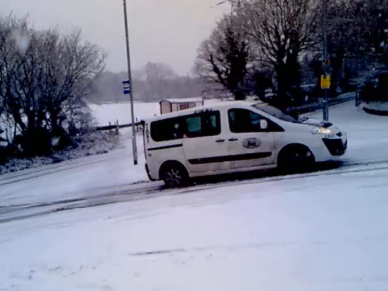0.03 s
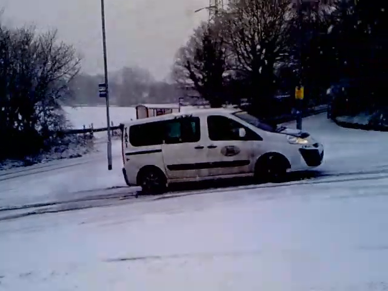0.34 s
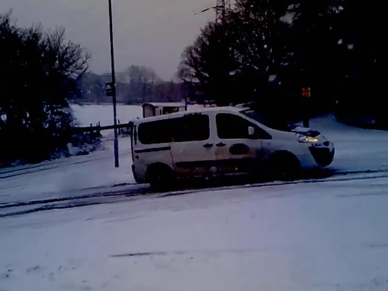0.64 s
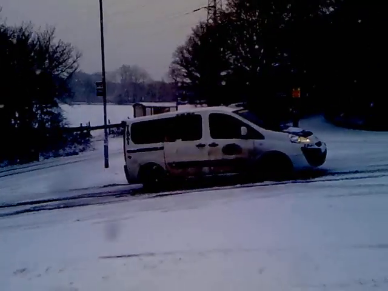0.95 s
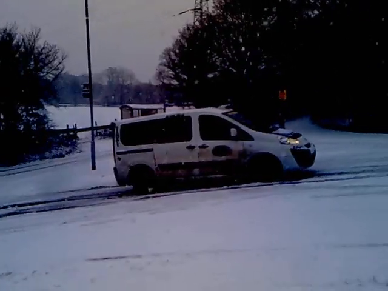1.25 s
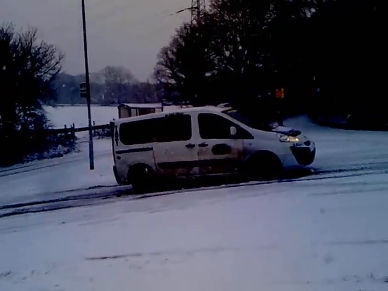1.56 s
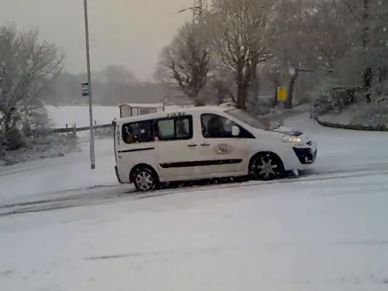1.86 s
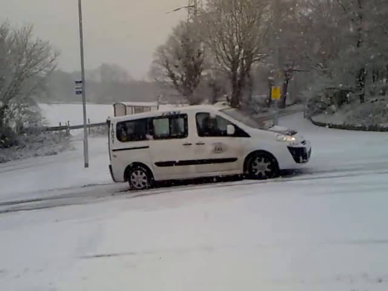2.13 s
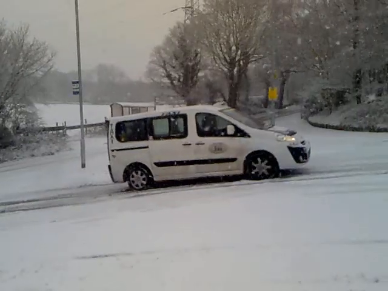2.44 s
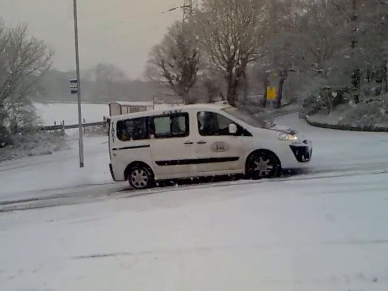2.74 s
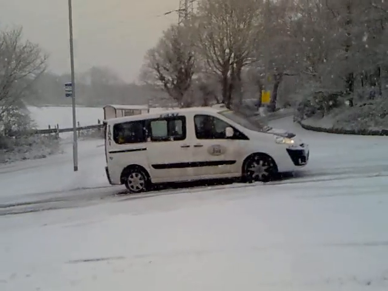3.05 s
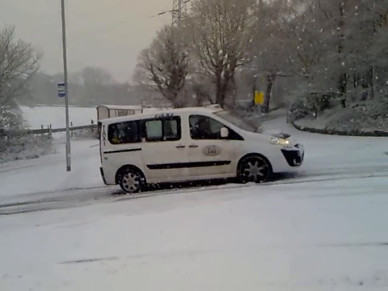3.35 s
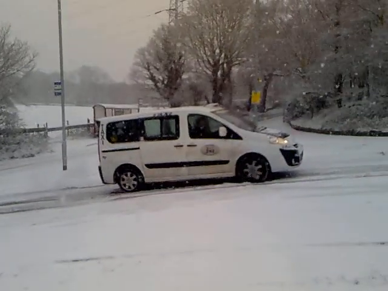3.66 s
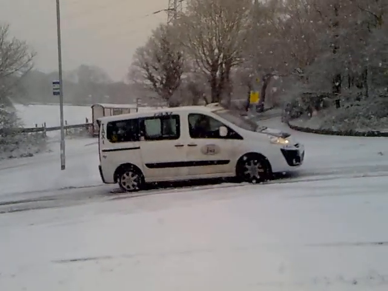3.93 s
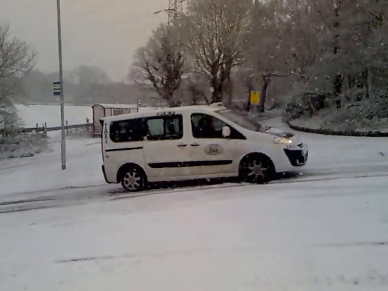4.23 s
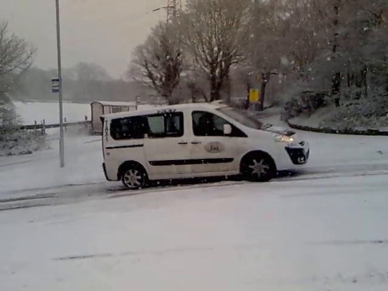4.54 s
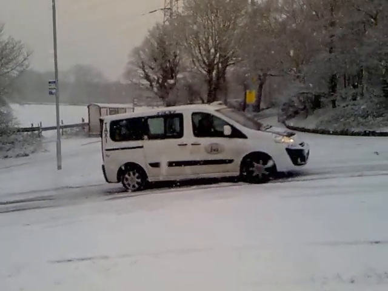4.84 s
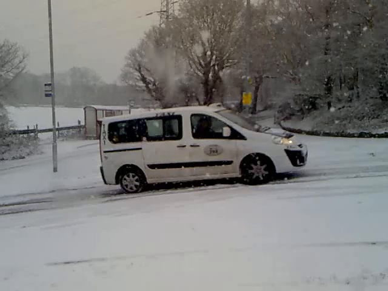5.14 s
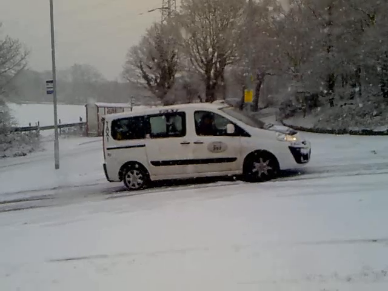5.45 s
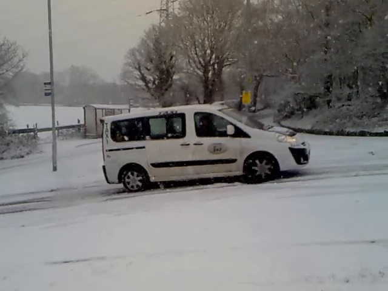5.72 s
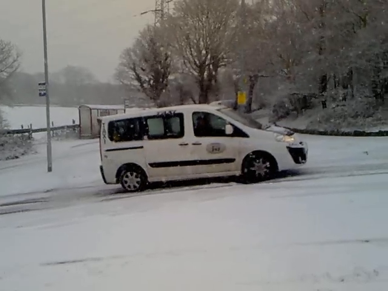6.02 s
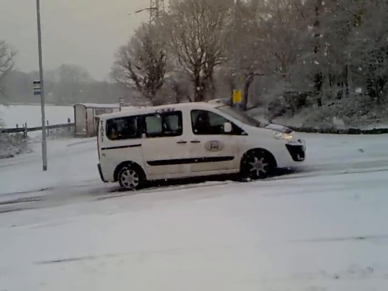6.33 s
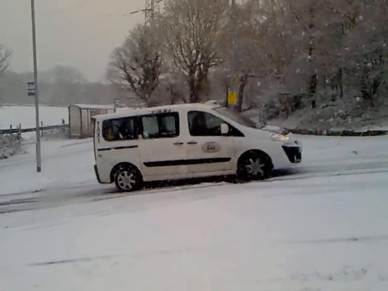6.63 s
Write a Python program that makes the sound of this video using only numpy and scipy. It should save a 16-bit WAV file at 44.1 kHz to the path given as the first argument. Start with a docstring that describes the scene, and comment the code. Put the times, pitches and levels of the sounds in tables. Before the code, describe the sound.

Outdoors, with no echo and a faint microphone hiss, a creeping van revs twice over the constant rumble and clatter of a large idling diesel. Air brakes vent in one bright burst, a deep drone fades away, and everything cuts out briefly. The engines return, the van chugging hollowly before it revs a third time. One light tap sounds close by early on, and another just before the end.

```python
"""Snowy junction, beside an idling heavy diesel: exhaust throb, combustion clatter, steady hum. A second deep
drone beats with the idle, then fades. A creeping van revs three times, its firings ringing the silencer. The
heavy vehicle vents brake air once, through a ringing pipe and a bright jet. Two small knocks fall close by. The
sound starts after a short silence and cuts out briefly halfway."""
import sys
import numpy as np
from scipy import signal
from scipy.fft import rfft, irfft, next_fast_len
from scipy.io import wavfile

SR = 44100
rng = np.random.default_rng(int(sys.argv[2]) if len(sys.argv) > 2 else 0)


def bounce(signal):
    """Save signal as a 16-bit WAV file at the path given by the first command-line argument."""
    frames = np.transpose(np.atleast_2d(signal))
    limited = np.clip(frames, -1, 1)
    pcm = np.round(limited * 32767).astype(np.int16)
    wavfile.write(sys.argv[1], SR, pcm)


N = 298998
T = np.arange(N) / SR

# diesel exhaust (order [x firing rate], level [dB])
IDLE_ORDERS = [(1, -41), (1.5, -57.5), (2, -56), (3, -59.5), (4, -64.5)]
# diesel noise spectra (frequency [Hz], relative density [dB])
CLATTER_SPECTRUM = [(200, -17.5), (290, -3), (360, -1.5), (500, -3), (660, -3.5), (800, -1.1), (1000, 0.5),
                    (1250, -4), (1700, -5), (2200, -7), (2600, -13), (3300, -19), (4400, -27),
                    (5700, -23.5), (7000, -28.5), (9000, -47.5)]
RUMBLE_SPECTRUM = [(12, -27), (26, -16), (45, -3.5), (65, 1), (90, -3), (130, -5), (190, -5.5), (260, -8),
                   (330, -12.5), (480, -31.5), (900, -50)]
# engine panels (frequency [Hz], relative level [dB])
PANEL_MODES = [(312, 3.5), (575, -1.5), (788, 0.5), (990, -5), (1380, -0.5)]
# van pedal (down [s], up [s], top firing rate [Hz], load [dB])
PEDAL_PRESSES = [(-0.5, 0.54, 36.71, 3.5), (1.56, 2.40, 40.54, 1.5), (6.0, 7, 39.9, -0.2)]
# van exhaust (order [x firing rate], relative level [dB])
VAN_ORDERS = [(1, -57), (2, -51.5), (3, -48.5), (4, -50.5), (5, -62.5), (6, -61)]
# van rattle (frequency [Hz], relative density [dB])
RATTLE_SPECTRUM = [(150, -13), (330, 1.5), (600, 0), (900, -2.5), (1400, -1), (2100, -11), (2900, -9),
                   (3600, -12.5), (4400, -25), (7000, -42)]
# silencer drive per cylinder (relative level [dB])
CYLINDERS_DB = [0, -1, -8, -9]
# brake air spectra (frequency [Hz], relative density [dB])
PIPE_SPECTRUM = [(600, -29.5), (1100, -3.5), (1650, -4.5), (2200, -6), (2800, -11.5), (3400, -11),
                 (4000, -24.5), (5000, -35)]
JET_SPECTRUM = [(3000, -31), (4300, -8.5), (5400, -8), (6250, -2.5), (6750, -2.5), (7300, -7.5),
                (8000, -12.5), (9000, -17.5), (10500, -21.5), (12500, -39)]
# brake air resonances (frequency [Hz], relative level [dB])
PIPE_MODES = [(1075, -6), (1195, -0.5), (1515, -1), (1565, -9), (1617, -0.5), (1710, -1.5), (1765, -2),
              (1902, 0.5), (2188, -1.5), (2270, -1.5), (2460, -4), (2653, -4), (2775, -2.5), (2972, -6.5),
              (3160, -13), (3290, -30), (3492, -11.5)]
JET_MODES = [(5512, -73.5), (5927, -69), (6045, -67), (6239, -68), (6295, -64.5), (6514, -69), (6982, -78),
             (7181, -71)]
# panel taps (time [s], level [dB], frequency [Hz], decay [s])
KNOCKS = [(1.1686, -31, 480, .002), (6.7553, -21, 760, .0012)]
# steady hum tones (frequency [Hz], level [dB])
HUM_TONES = [(112.2, -59.5), (224.5, -59.5)]
# microphone hiss (frequency [Hz], relative density [dB])
HISS_SPECTRUM = [(1000, 2.5), (5000, -11.5), (8500, -3), (11000, -3), (13500, -1), (15600, 0)]
# spans with sound (start [s], stop [s])
AUDIBLE_SPANS = [(0.229, 3.56), (3.719, 6.9)]

IDLE_FIRING_HZ, CLATTER_DB, RUMBLE_DB = 35.03, -47.5, -49.0
DRONE_HZ, DRONE_DB, DRONE_HOLD_UNTIL_S, DRONE_FADE_DB_PER_S = 43.55, -48.5, 3.2, 45
TICKOVER_HZ, CLIMB_HZ_PER_S, COAST_HZ_PER_S = 26.2, 18.5, 26
EXHAUST_DB_PER_OCTAVE, RATTLE_DB_PER_OCTAVE = 27.5, 18.5
SILENCER_HZ, SILENCER_WIDTH_HZ, CYLINDER_1_FIRES_S = 220.4, 22.5, 3.998
VALVE_OPEN_S, VALVE_SHUT_S = 2.832, 3.174
PIPE_DB, PIPE_ATTACK_S, PIPE_FADE_DB_PER_S = -41, 0.0083, 605
LEAK_DB, LEAK_FADE_DB_PER_S = -51.5, 66
JET_DB, JET_ATTACK_S, JET_HOLD_S, JET_FADE_DB_PER_S = -48.5, 0.036, 0.27, 190
LOW_PASS_HZ = 15750


def diesel_idle():
    """Six cylinders at governed speed: exhaust throb, clatter with ringing panels, rumble."""
    cycles = IDLE_FIRING_HZ * T + 0.014 * wander(2.5)
    throb = sum(gain_of(db) * tone(order * cycles) for order, db in IDLE_ORDERS)
    pulses = firings(cycles, depth=0.4, decay_cycles=0.15, uneven_db=2.5, cylinders=6)
    colour = unit_rms(noise(CLATTER_SPECTRUM) + 0.27 * ringing(PANEL_MODES, width_hz=28))
    clatter = colour * pulses * gain_of(CLATTER_DB + 0.26 * wander(12))
    rumble = noise(RUMBLE_SPECTRUM) * gain_of(RUMBLE_DB + 1.2 * wander(8))
    return throb + clatter + rumble


def drone():
    """Deep tone that beats with the idle, then fades."""
    level_db = DRONE_DB - DRONE_FADE_DB_PER_S * np.maximum(T - DRONE_HOLD_UNTIL_S, 0)
    return tone(DRONE_HZ * T + 0.055 * wander(1.6)) * gain_of(level_db)


def van():
    """Four cylinders: exhaust and rattle grow with revs and load; chug is clearest at tickover."""
    firing_hz, load_db = pedal()
    revs_octaves = np.log2(firing_hz / firing_hz.max())
    cycles = np.cumsum(firing_hz) / SR
    cycles = cycles - np.interp(CYLINDER_1_FIRES_S, T, cycles) + 0.025 * wander(6)
    exhaust = sum(gain_of(db + 1.04 * wander(7)) * tone(order * cycles) for order, db in VAN_ORDERS)
    exhaust *= gain_of(-1.1 + EXHAUST_DB_PER_OCTAVE * revs_octaves + 0.69 * load_db)
    rattle = noise(RATTLE_SPECTRUM)
    rattle *= firings(cycles, depth=1.1, decay_cycles=0.2, uneven_db=1.0, cylinders=4)
    rattle *= gain_of(-49.0 + RATTLE_DB_PER_OCTAVE * revs_octaves + load_db)
    chug = silencer(cycles) * gain_of(-52.5 - 5.1 * revs_octaves)
    return exhaust + rattle + chug


def pedal():
    """Each press raises the revs, which coast back to tickover. Returns (firing rate [Hz], load [dB])."""
    lift_hz, load_db = np.zeros(N), np.zeros(N)
    for down_s, up_s, top_hz, top_load_db in PEDAL_PRESSES:
        span_hz = top_hz - TICKOVER_HZ
        climb_hz = CLIMB_HZ_PER_S * (T - down_s)
        coast_hz = span_hz - COAST_HZ_PER_S * (T - up_s)
        press_hz = np.clip(np.minimum(climb_hz, coast_hz), 0, span_hz)
        lift_hz += press_hz
        load_db += top_load_db * press_hz / span_hz
    return TICKOVER_HZ + lift_hz, load_db


def silencer(cycles):
    """Each firing rings the hollow box; two strong cylinders, then two weak, make it chug."""
    stroke = np.floor(cycles).astype(int)
    strength = gain_of(CYLINDERS_DB)[stroke % len(CYLINDERS_DB)]
    puffs = strength * np.exp(-(cycles % 1) / 0.33) * rng.standard_normal(N)
    kicks = strength * np.diff(stroke, prepend=stroke[0])
    drive = unit_rms(puffs) + 1.7 * unit_rms(kicks)
    box = signal.iirpeak(SILENCER_HZ, Q=SILENCER_HZ / SILENCER_WIDTH_HZ, fs=SR)
    tailpipe = signal.iirpeak(SILENCER_HZ, Q=1.3, fs=SR)
    return unit_rms(signal.lfilter(*tailpipe, signal.lfilter(*box, drive)))


def firings(cycles, depth, decay_cycles, uneven_db, cylinders):
    """Envelope of one dying puff per firing; strength varies by cylinder and by stroke."""
    elapsed = cycles - cycles.min()
    stroke = elapsed.astype(int)
    bias, jitter = rng.standard_normal(cylinders), rng.standard_normal(1024)
    strength = gain_of(uneven_db * (bias[stroke % cylinders] + jitter[stroke % len(jitter)]))
    return unit_rms(1 + depth * strength * np.exp(-(elapsed % 1) / decay_cycles))


def brake_air():
    """Air rings a pipe; the jet builds later and dies first as pressure drops. A weak leak lingers."""
    pipe = unit_rms(noise(PIPE_SPECTRUM) + 1.5 * ringing(PIPE_MODES, width_hz=45))
    jet = unit_rms(noise(JET_SPECTRUM) + 0.66 * ringing(JET_MODES, width_hz=45))
    rush = airflow(PIPE_DB, PIPE_ATTACK_S, VALVE_SHUT_S, PIPE_FADE_DB_PER_S)
    leak = airflow(LEAK_DB, PIPE_ATTACK_S, VALVE_SHUT_S, LEAK_FADE_DB_PER_S)
    blast = airflow(JET_DB, JET_ATTACK_S, VALVE_OPEN_S + JET_HOLD_S, JET_FADE_DB_PER_S)
    flutter = gain_of(0.79 * wander(70))
    return flutter * (pipe * np.maximum(rush, leak) + jet * blast)


def airflow(level_db, attack_s, hold_until_s, fade_db_per_s):
    """Envelope: rises as the valve opens, holds, dies away."""
    rise = np.clip((T - VALVE_OPEN_S) / attack_s, 0, 1)
    return rise * gain_of(level_db - fade_db_per_s * np.maximum(T - hold_until_s, 0))


def knocks():
    """Light taps on a dead panel, gone in a few cycles."""
    taps = np.zeros(N)
    for time_s, db, hz, decay_s in KNOCKS:
        age_s = np.maximum(T - time_s, 0)
        taps += gain_of(db) * np.sin(2 * np.pi * hz * age_s) * np.exp(-age_s / decay_s)
    return taps


def hum():
    """Steady hum tones, wavering in level and phase."""
    return sum(gain_of(db + 0.82 * wander(6)) * tone(hz * T + 0.074 * wander(3.8))
               for hz, db in HUM_TONES)


def noise(spectrum):
    """Unit-rms noise shaped by (frequency [Hz], relative density [dB]) points."""
    size = next_fast_len(N)
    hz = np.fft.rfftfreq(size, 1 / SR)
    points_hz, points_db = np.transpose(spectrum)
    colour = gain_of(np.interp(np.log(hz + 1), np.log(points_hz), points_db))
    return unit_rms(irfft(rfft(rng.standard_normal(size)) * colour, size)[:N])


def ringing(modes, width_hz):
    """Unit-rms noise in narrow resonances (frequency [Hz], relative level [dB])."""
    size = next_fast_len(N)
    hz = np.fft.rfftfreq(size, 1 / SR)
    power = sum(gain_of(db) ** 2 / (1 + (2 * (hz - mode_hz) / width_hz) ** 2) ** 2
                for mode_hz, db in modes)
    return unit_rms(irfft(rfft(rng.standard_normal(size)) * np.sqrt(power), size)[:N])


def wander(max_hz):
    """Unit-rms random drift."""
    coarse_s = T[::64]
    rates_hz, phases = np.geomspace(max_hz / 10, max_hz, 20), rng.random(20)
    drift = np.sin(2 * np.pi * (np.outer(coarse_s, rates_hz) + phases)).sum(1)
    return unit_rms(np.interp(T, coarse_s, drift))


def tone(cycles):
    """Unit-rms sine, random start phase."""
    return np.sqrt(2) * np.sin(2 * np.pi * (cycles + rng.random()))


def gain_of(db):
    """Decibels to amplitude."""
    return 10 ** (np.asarray(db) / 20)


def unit_rms(x):
    """Scales to rms 1."""
    return x / np.sqrt(np.mean(x ** 2) + 1e-20)


def scene():
    """Dry mono mix: snow absorbs the echoes."""
    return (diesel_idle() + drone() + hum() + van() + brake_air() + knocks())[None]


def record(dry):
    """Microphone hiss with a faint whine, brief silences, low-pass."""
    hiss = gain_of(-62.0) * noise(HISS_SPECTRUM)
    whine = gain_of(-82.5) * ringing([(11300, 0)], width_hz=170)
    gate = sum((T >= start_s) & (T < stop_s) for start_s, stop_s in AUDIBLE_SPANS)
    low_pass = signal.firwin(1023, LOW_PASS_HZ, window=("kaiser", 9), fs=SR)
    return signal.oaconvolve((dry + hiss + whine) * gate, low_pass[None], "same")


dry = scene()
out = record(dry)
bounce(out)
```